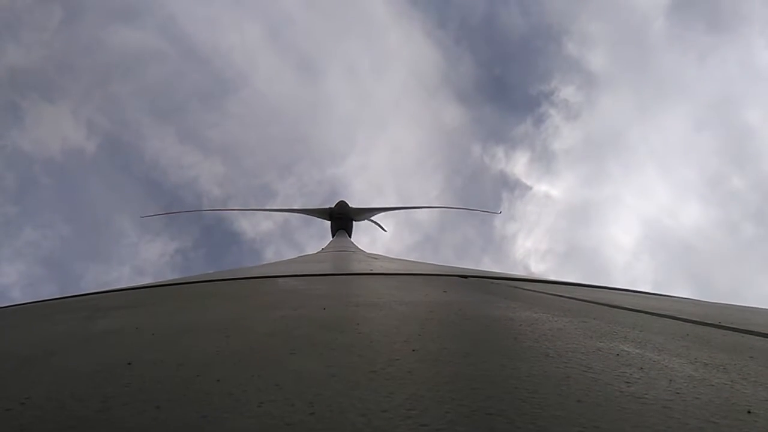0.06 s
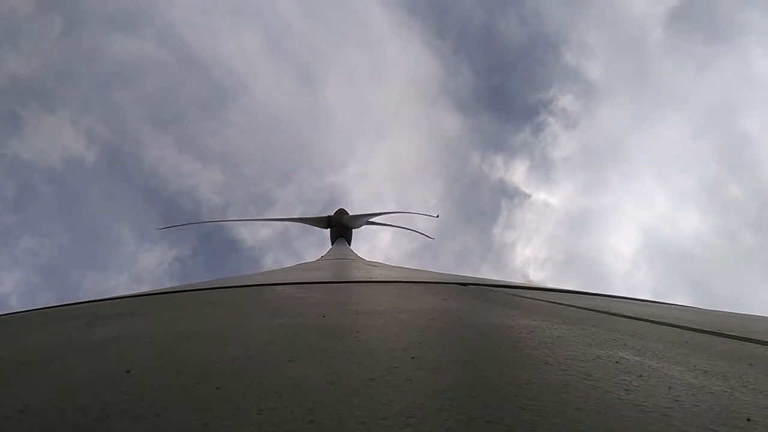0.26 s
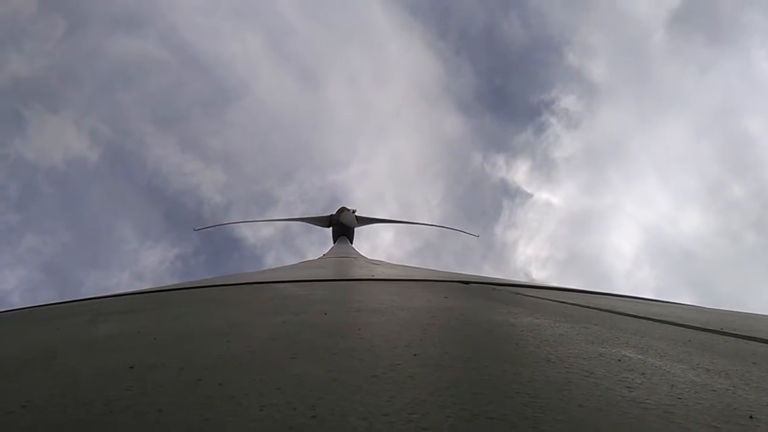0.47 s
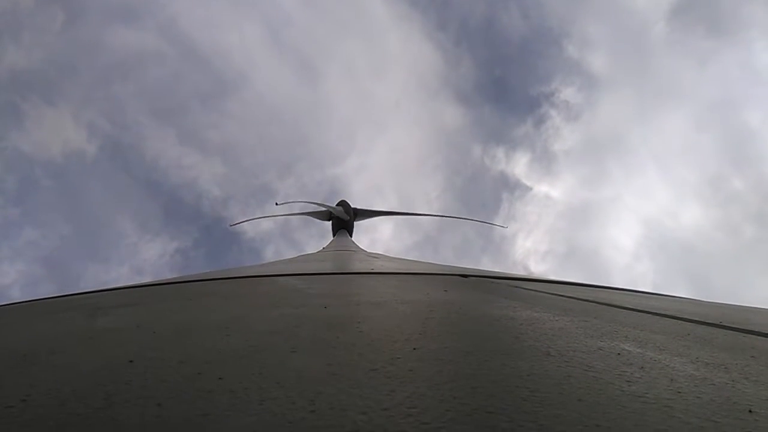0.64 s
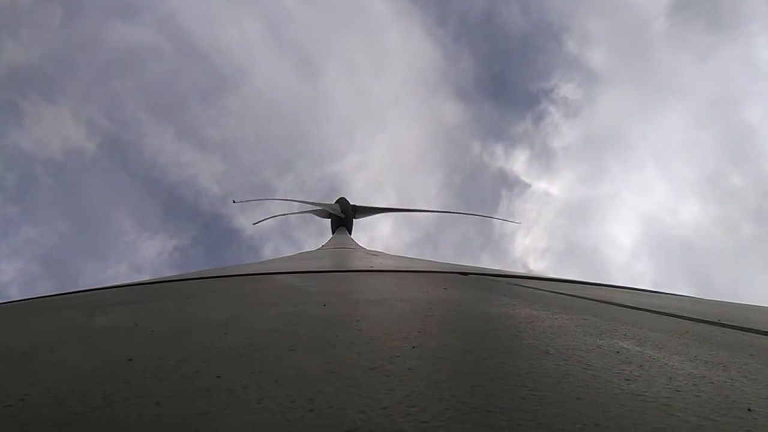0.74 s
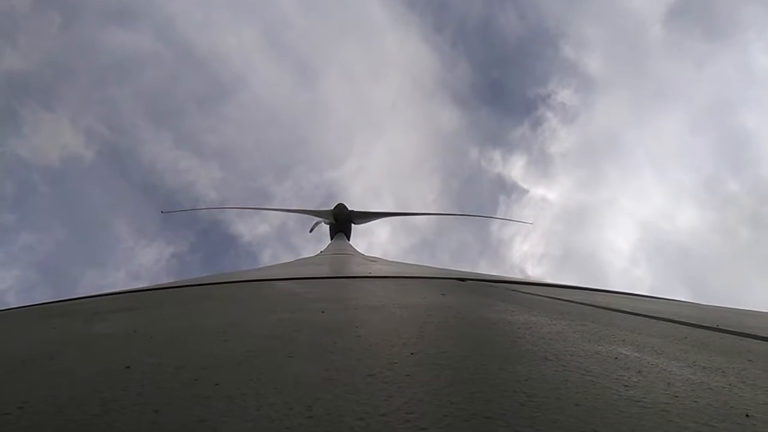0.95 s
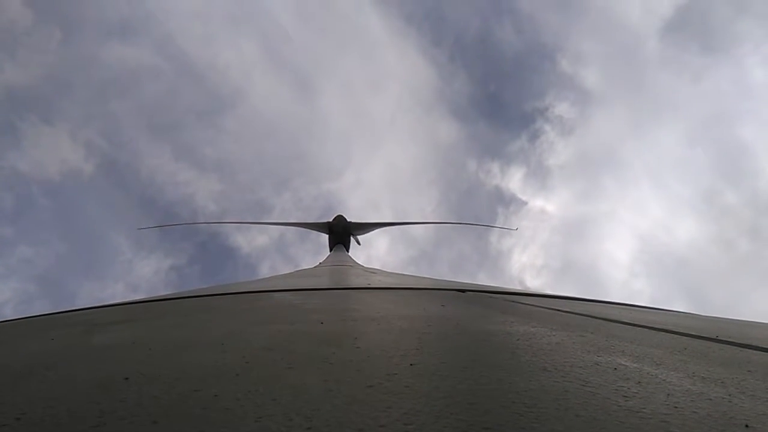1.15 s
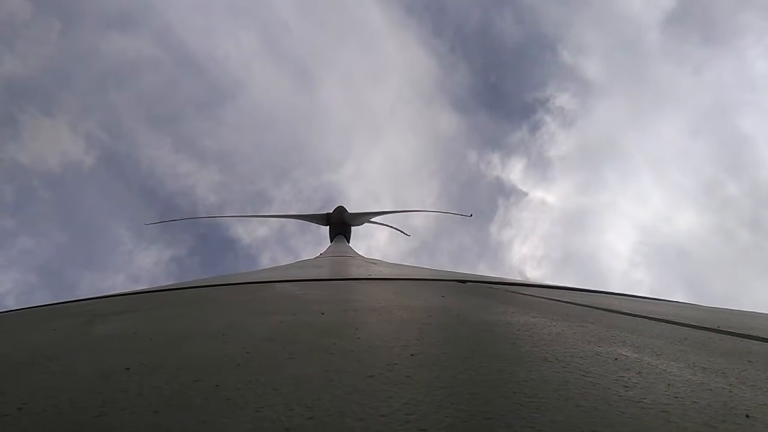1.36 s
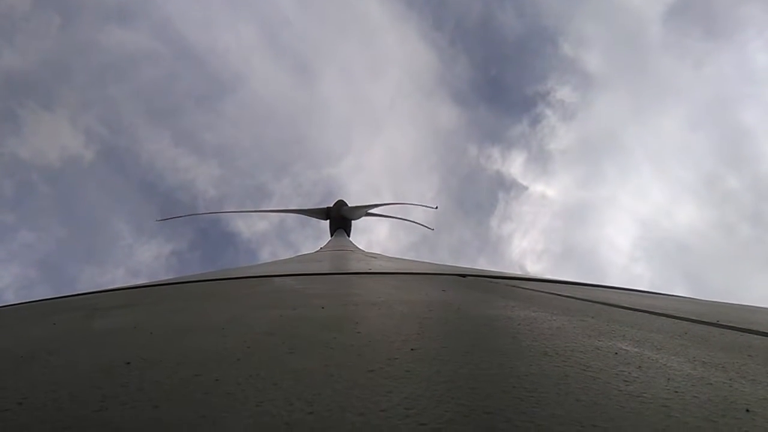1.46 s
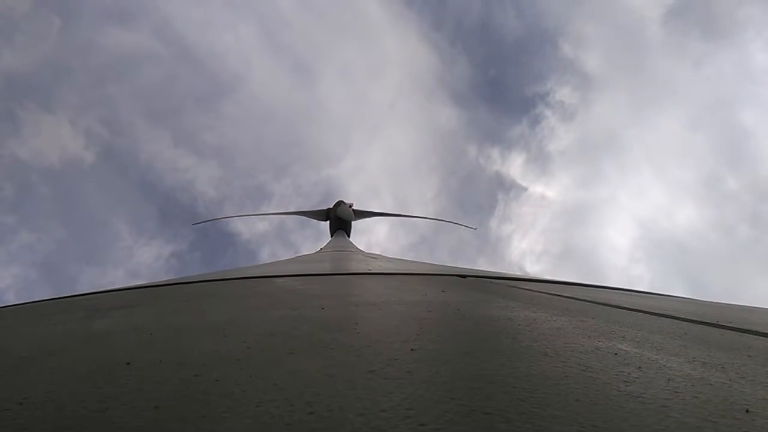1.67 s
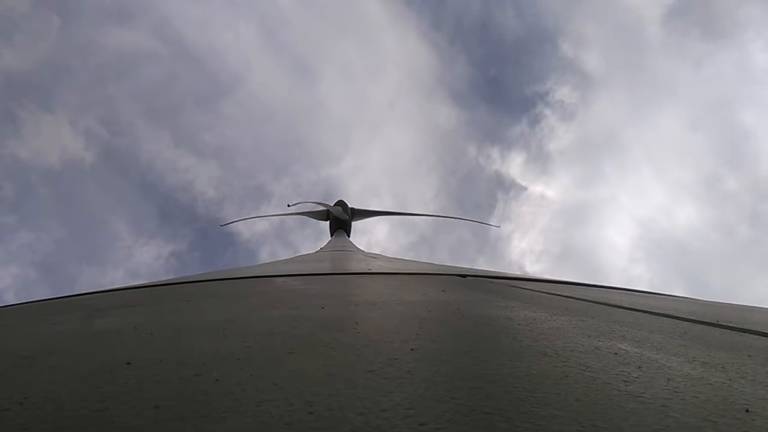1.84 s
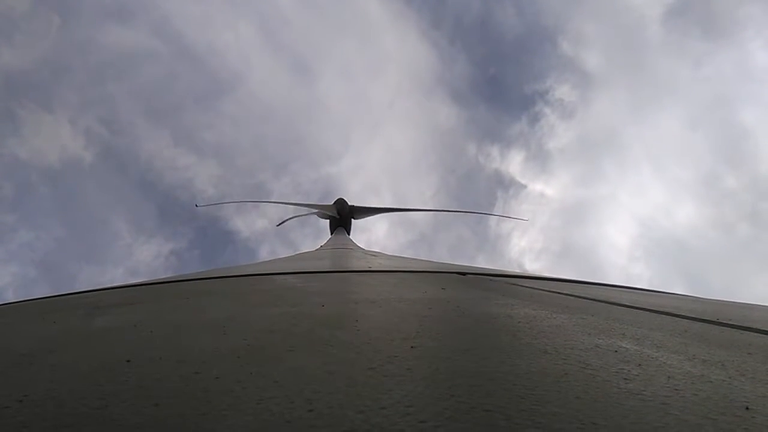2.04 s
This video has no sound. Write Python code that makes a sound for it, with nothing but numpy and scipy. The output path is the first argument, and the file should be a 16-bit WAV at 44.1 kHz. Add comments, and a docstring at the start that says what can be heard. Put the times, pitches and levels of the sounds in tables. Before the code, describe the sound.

Gusty wind rumbles on the microphone under a wind turbine, while fingers tick against the case.

```python
"""Gusts under a wind turbine

Wind buffets a small camera at the foot of the tower, rumbling and thumping on its microphone.
Fingers tick and scuff on the case, mostly during the first second.
Behind them lie the steady rush of the air and a faint swish of the blades overhead."""
import sys
import numpy as np
from scipy import signal
from scipy.fft import rfft, irfft
from scipy.io import wavfile
from scipy.ndimage import uniform_filter1d

SR = 44100
rng = np.random.default_rng(int(sys.argv[2]) if len(sys.argv) > 2 else 0)


def digitize_waveform(pressure):
    """Quantize a signal to 16-bit integers and store it at the path in sys.argv[1].

    Rows of a 2-D input are taken as channels; values are limited to [-1, 1].
    """
    field = np.atleast_2d(pressure).T
    bounded = np.clip(field, -1, 1)
    quanta = np.round(bounded * 32767).astype(np.int16)
    wavfile.write(sys.argv[1], SR, quanta)


N = 92610
T = np.arange(N) / SR


def amp(db):
    """Turns decibels into a number to multiply by."""
    return 10 ** (np.asarray(db) / 20)


def unit(x):
    """Scales a signal to an average strength (rms) of 1."""
    return x / np.sqrt(np.mean(x ** 2) + 1e-20)


def curve(rows, column=1):
    """Joins the points of a time table with straight lines."""
    rows = np.array(rows)
    return np.interp(T, rows[:, 0], rows[:, column])


def colour(x, tone):
    """Turns pitches up or down by a table of f/Hz, level/dB."""
    hz, db = np.transpose(tone)
    f = np.fft.rfftfreq(len(x), 1 / SR)
    gain = amp(np.interp(np.log(f + 1), np.log(hz), db))
    return irfft(rfft(x) * gain, len(x))


def noise(tone):
    """Noise of strength 1 with the given tone."""
    return unit(colour(rng.standard_normal(N), tone))


def smooth(x, seconds):
    """Blurs a signal with a bell-shaped running average."""
    t = np.arange(-SR // 10, SR // 10 + 1) / SR
    bell = np.exp(-(2 * t / seconds) ** 2)
    return signal.fftconvolve(x, bell / bell.sum(), "same")


def steadied(x, seconds):
    """Evens out swells slower than the given time."""
    return x / np.sqrt(abs(smooth(x ** 2, seconds)) + 1e-9)


def add(mix, start_s, sound):
    """Mixes a sound in at the given time."""
    part = mix[max(round(start_s * SR), 0):][:len(sound)]
    part += sound[:len(part)]


def whistle(centre_hz, width_hz):
    """A band of hiss that follows a pitch curve."""
    white = rng.standard_normal(N) + 1j * rng.standard_normal(N)
    band = signal.lfilter(*signal.butter(2, width_hz / 2, fs=SR), white)
    phase = 2j * np.pi * np.cumsum(centre_hz) / SR
    return unit((band * np.exp(phase)).real)


def patchy(x, depth_db=2, patch_s=0.067, size=512):
    """Swirling air lets neighbouring pitch bands swell and fade on their own."""
    bands = signal.stft(x, nperseg=size)[2]
    frames = max(round(patch_s * SR * 2 / size), 1)
    drift = uniform_filter1d(rng.standard_normal(bands.T.shape), frames, axis=0)
    patches = unit(uniform_filter1d(drift, 12, axis=1))  # about 12 bands move together
    return signal.istft(bands * amp(depth_db * patches.T), nperseg=size)[1][:N]


# tone of the distant air: f/Hz, level/dB
AIR_TONE = [(30, -2), (80, 9.5), (200, -2.5), (400, -9.5), (620, -15), (900, -16), (1400, -23.5),
            (2200, -31.5), (4000, -39.5), (5000, -41.5), (6300, -34), (8200, -31), (11000, -40),
            (14000, -44)]
# its loudness over time: t/s, level/dB
AIR_LEVEL = [(0, -55.5), (.06, -48.5), (.7, -52.5), (1.05, -54), (1.35, -52), (1.7, -50), (2.1, -51.5)]
# moans in the air: f/Hz, width/Hz, level/dB
MOANS = [(204.4, 37, -61), (385.5, 49, -71.5), (620, 61, -73.5), (1016, 69, -76.5)]

def air():
    """Wind rushes steadily around the tower, with a few faint moans in it."""
    moans = sum(amp(db) * whistle(np.full(N, hz), width) for hz, width, db in MOANS)
    return noise(AIR_TONE) * amp(curve(AIR_LEVEL)) + moans


# how the gusts drive the deep rumble and the rougher flutter above it: t/s, relative level/dB
RUMBLE_LEVEL = [(0, -82), (.06, -48), (.13, -71), (.18, -47), (.245, -28.5), (.275, -33.5), (.315, -21.5),
                (.355, -31.5), (.43, -33), (.485, -17.5), (.525, -28), (.60, -24.5), (.70, -33),
                (.83, -36.5), (.885, -43.5), (.93, -34.5), (.99, -29.5), (1.04, -47), (1.10, -47),
                (1.15, -21.5), (1.235, -36), (1.275, -23), (1.33, -34.5), (1.36, -29), (1.47, -36),
                (1.525, -25), (1.63, -39), (1.74, -28), (1.785, -50.5), (1.83, -31), (1.89, -55.5),
                (1.97, -53), (2.01, -38.5), (2.045, -60), (2.08, -32.5), (2.1, -50)]
FLUTTER_LEVEL = [(0, -67), (.055, -41.5), (.1, -63.5), (.19, -60), (.235, -36.5), (.27, -38.5),
                 (.30, -26.5), (.49, -28), (.53, -28.5), (.58, -27), (.62, -31.5), (.745, -39), (.77, -47),
                 (.88, -57), (.97, -48.5), (1.03, -49.5), (1.10, -70), (1.135, -27.5), (1.19, -29.5),
                 (1.23, -39.5), (1.26, -35.5), (1.34, -40), (1.42, -38), (1.52, -33.5), (1.59, -41),
                 (1.72, -47), (1.8, -44.5), (1.95, -49.5), (2.1, -46)]
# tones of the rumble, the flutter and the tearing at the microphone's opening: f/Hz, level/dB
RUMBLE_TONE = [(15, -56), (25, -41), (38, -18), (50, -1), (72, 3), (110, -5.5), (150, -12.5), (250, -37),
               (600, -99)]
FLUTTER_TONE = [(50, -42), (100, -4.5), (145, 1.5), (200, -3), (300, -10.5), (400, -18.5), (600, -34.5),
                (900, -37), (1400, -56.5), (3000, -96)]
TEAR_TONE = [(200, -18), (400, 4), (600, 1.5), (800, -2), (1100, -25), (1600, -28), (3000, -53)]
# the microphone's loss of deep bass: f/Hz, level/dB
BASS_CUT = [(10, -23), (25, -14), (42, -0.5), (100, -0.5)]

def gusts():
    """Air churning at the microphone rumbles and flutters; strong gusts add a tearing edge."""
    rumble = steadied(noise(RUMBLE_TONE), seconds=.028) * amp(curve(RUMBLE_LEVEL))
    gust_db = curve(FLUTTER_LEVEL)
    flutter = steadied(noise(FLUTTER_TONE), seconds=.025) * amp(gust_db)
    tear_db, strong_gust_db, growth = -51, -26, 0.81
    tear = noise(TEAR_TONE) * amp(tear_db + growth * (gust_db - strong_gust_db))
    return colour(amp(-0.28) * rumble + amp(-1.5) * flutter + tear, BASS_CUT)


# tone of the broad rush as one blade leaves: f/Hz, level/dB
RUSH_TONE = [(500, 15), (1000, -4), (1800, -0.5), (3200, 0), (5500, -5), (9000, -25), (14000, -51)]
# its loudness over time: t/s, level/dB
RUSH_LEVEL = [(0, -80), (.05, -58.5), (.08, -58.5), (.2, -62), (.5, -62), (.8, -60), (1.0, -68.5),
              (1.2, -76), (1.4, -69.5), (2.1, -93)]
# narrow hiss as the next blade comes: t/s, relative level/dB, f/Hz
SWISH = [(0, -84, 5130), (1.3, -103, 5310), (1.5, -80, 5250), (1.6, -79.5, 5000), (1.66, -69.5, 4900),
         (1.78, -73, 4900), (1.84, -73.5, 5020), (1.89, -71, 4800), (1.97, -72.5, 4720), (2.02, -82, 4680),
         (2.1, -76.5, 4610)]
# a lower hiss late in the sweep: t/s, level/dB
LOW_SWISH_LEVEL = [(0, -100), (1.8, -93), (1.88, -79.5), (2.1, -80)]

def blades():
    """One blade leaves with a rush; the next sweeps by with two hisses that sink in pitch."""
    hz = curve(SWISH, column=2)
    core = whistle(hz, width_hz=650)
    fringe = amp(-1.5) * whistle(hz, width_hz=2200)
    high = (core + fringe) * amp(curve(SWISH))
    low = whistle(hz * .78, width_hz=500) * amp(curve(LOW_SWISH_LEVEL))
    rush = noise(RUSH_TONE) * amp(curve(RUSH_LEVEL))
    return high + low + rush


# pitches at which each tick's tone is set: f/Hz
TICK_BANDS = [1000, 2600, 4500, 7200, 9000, 12500]
# finger ticks: t/s, rattle fade/s, rattle against snap/dB, then level/dB at each of TICK_BANDS
TICKS = [(0.0426, .005, -1, -34, -26, -18, -20, -21, -27), (.0517, 0.0037, -12, -7.5, 1, -6, 2, -2, -2.5),
         (0.0578, 0.0038, -3.5, -5, -13, -19, -28, -33, -30),
         (0.2268, 0.011, -14, -7, 0, 2.5, -4, -17.5, -3.5),
         (.5767, 0.0052, -21, -20, -15, -4.5, -4.5, 0.5, -5),
         (0.7157, .002, -14, -31, -13, -7, -21, -27, -24), (0.718, 0.0051, -9, -22, -4.5, 3, -1.5, -7, -18),
         (0.719, .002, -6, -24, -6.5, -6, -13, -15, -22), (0.8183, .003, -6, 2.5, -2.5, -8, -1, 0, -8),
         (1.241, .002, -6, -45, -44, -35, -30, -39, -36)]
# pitches the case favours: f/Hz, level/dB
CASE_TONE = [(200, -8.5), (600, -13), (1050, -5.5), (1600, -12.5), (2000, -10), (2600, -6.5), (3200, -11),
             (4500, -6), (5900, -11), (7200, -4), (9200, -5), (10200, -9.5), (14000, -18.5)]
# vibrations of the case that store a tick and let it out late: f/Hz, width/Hz
CASE_MODES = [(3950, 160), (3980, 560), (4400, 980), (3600, 1500), (4600, 1800)]

def finger_ticks(size=4096):
    """A finger snaps and rattles on the case, which delays some pitches into a tiny falling chirp."""
    out, lead = np.zeros(N), size // 8
    t = (np.arange(size) - lead) / SR
    f = np.fft.rfftfreq(size, 1 / SR)
    case_delay = np.exp(-2j * sum(np.arctan(2 * (f - hz) / width) for hz, width in CASE_MODES))
    snap = t == 0
    for start_s, fade_s, rattle_db, *levels in TICKS:
        rattle = rng.standard_normal(size) * (t > 0) * np.exp(-abs(t) / fade_s)
        touch = snap + amp(rattle_db) * rattle / np.linalg.norm(rattle)
        tick = colour(irfft(rfft(touch) * case_delay), CASE_TONE)
        spot_tone = list(zip(TICK_BANDS, levels))  # depends on where the finger lands
        add(out, start_s - lead / SR, colour(tick, spot_tone))
    return out


# small whirls of air that hit the microphone: t/s, f/Hz, spread/octaves, peak level/dB
EDDIES = [(.304, 520, .5, -39), (.311, 89.5, 0.43, -17.5), (.408, 534, 0.32, -30), (0.428, 143, 0.82, -17),
          (.457, 600, 0.63, -43), (.477, 153, 1.46, -27), (0.547, 397, 0.56, -34.5),
          (0.589, 370, 0.82, -23), (0.602, 86, 0.63, -22), (0.745, 139, 0.85, -27), (1.120, 220, 0.67, -24),
          (1.138, 157, 0.85, -16), (1.139, 555, 0.54, -32), (1.163, 620, 0.31, -30.5),
          (1.167, 397, 0.17, -26), (1.2, 231, 0.58, -25), (1.247, 293, 0.48, -31),
          (1.359, 261, 0.78, -23.5), (1.502, 253, 0.49, -26), (1.516, 167, 0.64, -24),
          (1.53, 194, 0.69, -22.5), (1.551, 185, 0.72, -28), (1.743, 74.6, 0.8, -24),
          (2.005, 180, 0.47, -35)]

def eddies(size=8192):
    """Each whirl of air thumps the microphone with a pressure swing of a cycle or two."""
    out = np.zeros(N)
    f = np.fft.rfftfreq(size, 1 / SR) + 1
    for middle_s, hz, spread, db in EDDIES:
        spectrum = np.exp(-(np.log2(f / hz) / spread) ** 2)
        phase = 2j * np.pi * rng.random()
        swing = np.fft.fftshift(irfft(spectrum * np.exp(phase)))
        add(out, middle_s - size / 2 / SR, amp(db) * swing / abs(swing).max())
    return out


# fingers sliding on the case: middle t/s, width/s, level/dB
SCUFFS = [(0.336, 0.024, -60), (0.389, 0.0097, -50), (0.5362, 0.0086, -40), (0.579, 0.015, -56),
          (0.601, 0.0036, -50.5), (0.621, 0.011, -46)]
# soft hiss left after a touch: t/s, fade/s, level/dB
HISSES = [(0.738, 0.06, -55), (0.824, 0.012, -45.5), (0.827, 0.087, -55.5), (1.03, 0.026, -71),
          (1.132, 0.06, -65)]
# tones of the scuffs and the hiss: f/Hz, level/dB
SCUFF_TONE = [(500, -14), (1200, -1.5), (1900, -15), (2800, -6.5), (3200, -3.5), (3900, 1.5), (5000, 0),
              (6100, -8.5), (7200, -0.5), (9000, -5), (10500, -19.5), (14000, -21.5)]
HISS_TONE = [(1000, -7.5), (2500, -19.5), (4300, -9), (5800, -11.5), (7600, 0), (9000, -3), (11000, -15.5),
             (14000, -22.5)]

def finger_rubs(grain_db=2, grain_s=.001, hiss_rise_s=0.0044):
    """Sliding fingers make short, grainy scuffs; a softer hiss dies away after some touches."""
    scuff_level = sum(amp(db) * np.exp(-((T - s) / width) ** 2) for s, width, db in SCUFFS)
    hiss_level = np.zeros(N)
    for start_s, fade_s, db in HISSES:
        rise = np.clip((T - start_s) / hiss_rise_s, 0, 1)
        hiss_level += amp(db) * rise * np.exp(-abs(T - start_s) / fade_s)
    jitter = unit(smooth(rng.standard_normal(N), grain_s))
    grain = unit(amp(grain_db * jitter))
    return scuff_level * grain * noise(SCUFF_TONE) + hiss_level * noise(HISS_TONE)


# how much of each pitch spreads to the sides: f/Hz, level/dB
STEREO_SPREAD = [(200, -78), (3000, -62), (4400, -25.5), (7700, -4), (14000, -5)]

def scene():
    """Everything sits in the centre; only the high pitches spread left and right."""
    centre = patchy(air() + blades()) + gusts() + finger_ticks() + eddies() + finger_rubs()
    side = patchy(air() + blades()) + amp(-31) * finger_ticks() + amp(-2.5) * finger_rubs()
    side = colour(side, STEREO_SPREAD)
    return np.array([centre + side, centre - side])


def record(dry):
    """The camera cuts off the very highest pitches."""
    cutoff_hz = 14350
    taps = signal.firwin(255, cutoff_hz, window=("kaiser", 8), fs=SR)
    return signal.oaconvolve(dry, taps[None], "same")


dry = scene()
out = record(dry)
digitize_waveform(out)
```